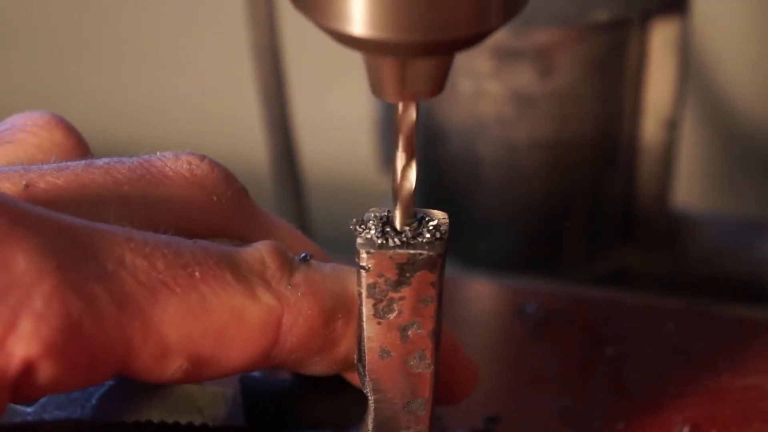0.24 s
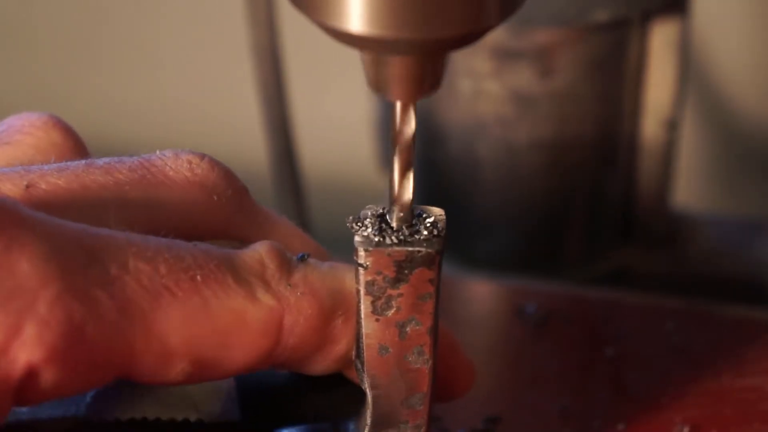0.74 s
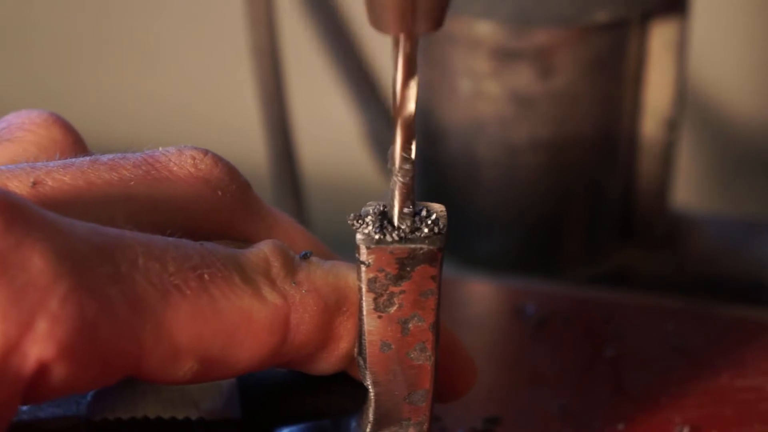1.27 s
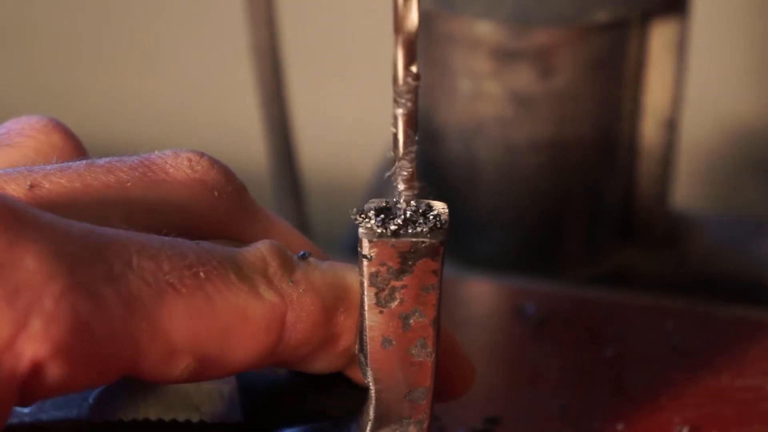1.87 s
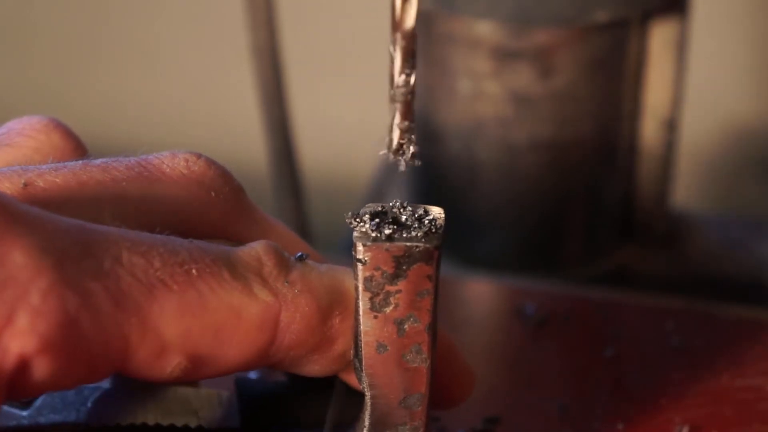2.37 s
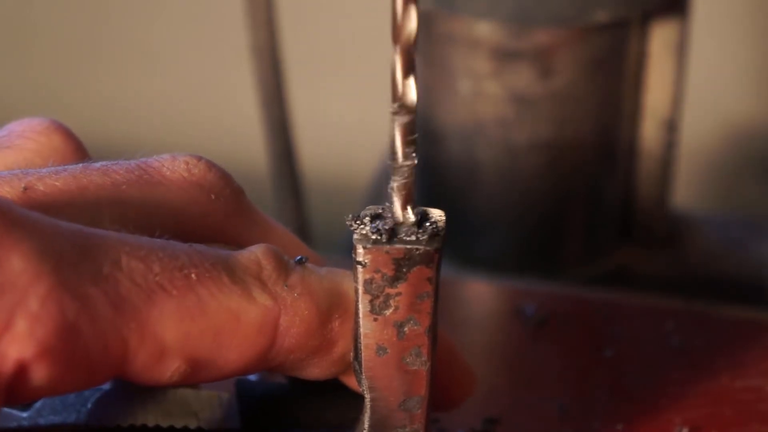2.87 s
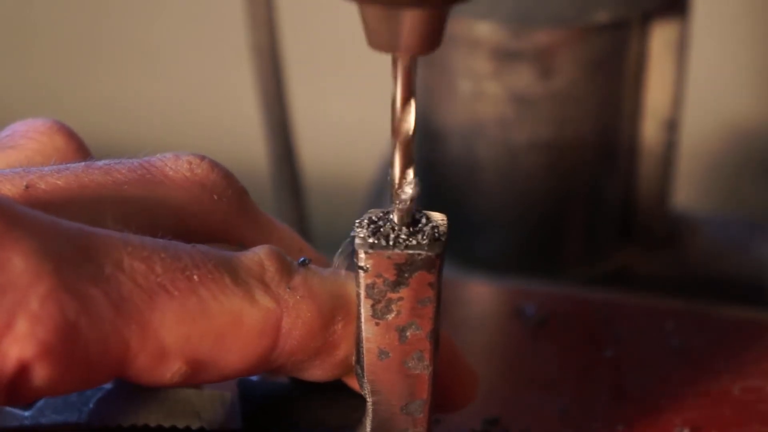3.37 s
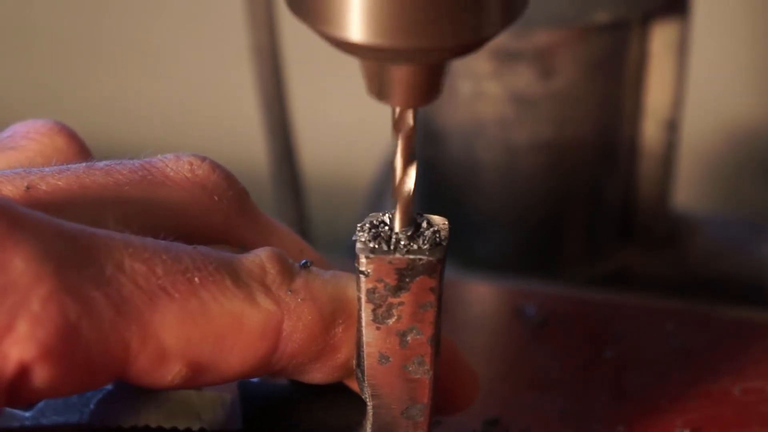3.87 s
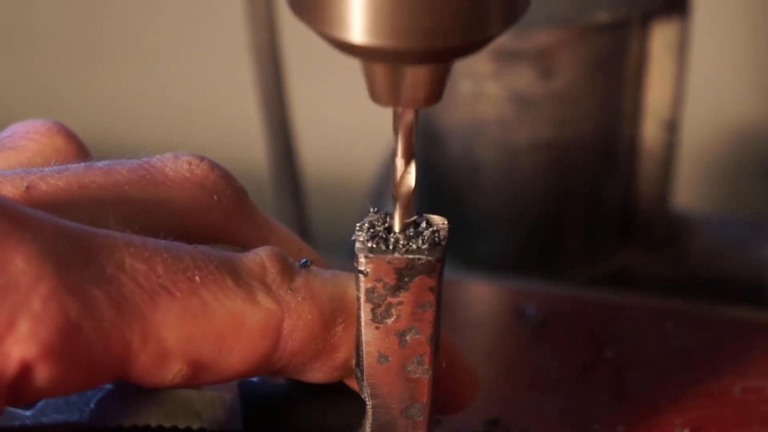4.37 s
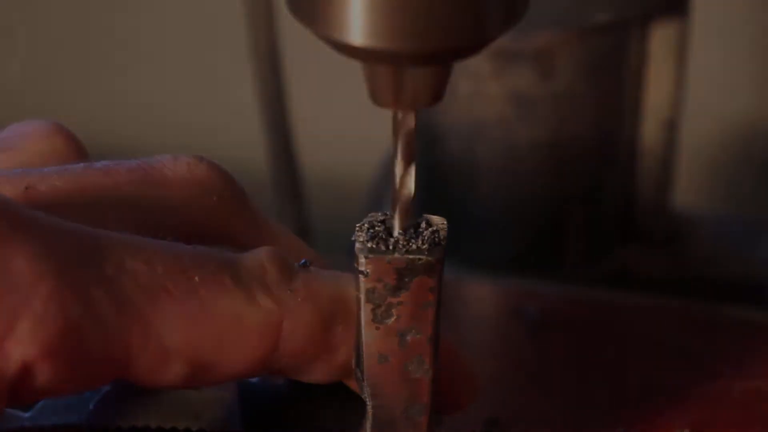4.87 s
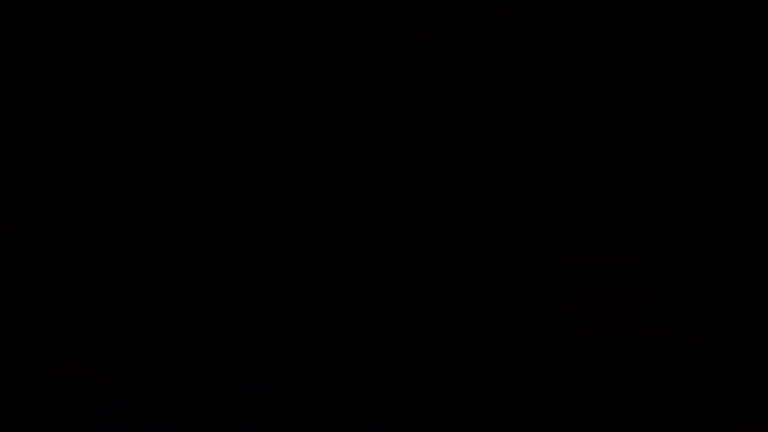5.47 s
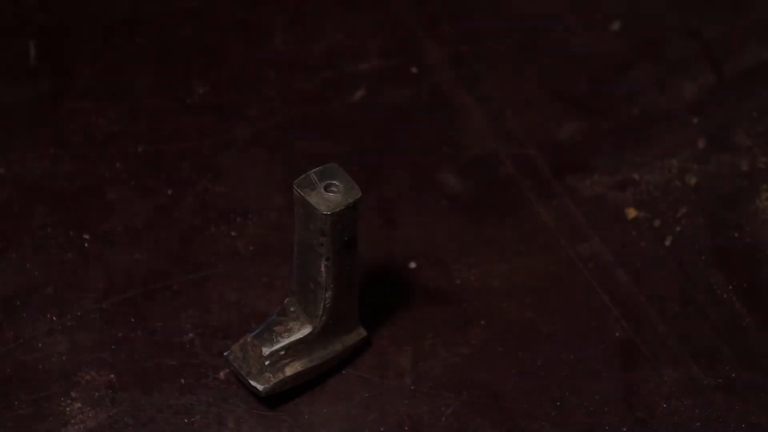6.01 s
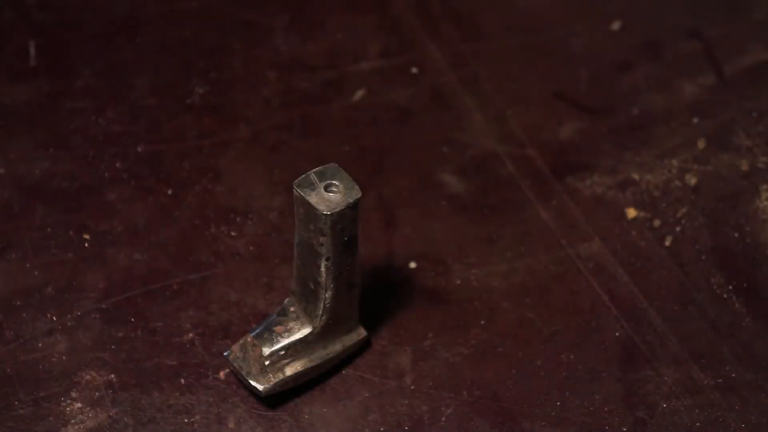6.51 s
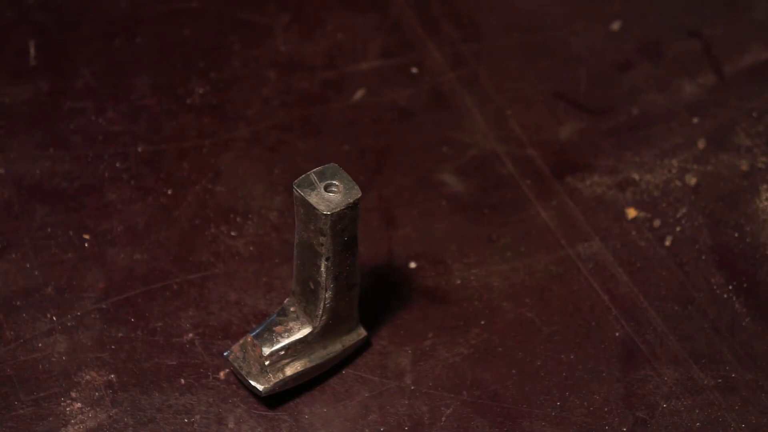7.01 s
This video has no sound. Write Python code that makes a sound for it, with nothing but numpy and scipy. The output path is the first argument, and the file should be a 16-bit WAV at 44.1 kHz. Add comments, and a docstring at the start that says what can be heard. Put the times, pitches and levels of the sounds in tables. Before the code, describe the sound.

A drill press runs close by with a steady motor whine, hum and rumble. Its bit bores into a steel spike with gritty hiss, thin high squeaks and irregular rattling clacks. The cutting eases off as the bit lifts while the motor keeps running, then it bites again. The sound cuts abruptly to a quiet workshop, with soft hand rustles, dull bench bumps and a few bright chinks of small steel parts.

```python
"""A drill press bores into a steel spike. From the start its induction motor whines over mains hum, belt
throb and a rumbling casting, while breaking chips ring the bit once a turn, its lip squeaks and the quill
clacks. The bit is lifted clear and the unloaded rotor speeds up; then the bit enters and cuts again.
At 5.5 s the sound cuts to the quiet workshop, where hands shuffle on a bench and small steel parts chink."""
import sys
import numpy as np
from scipy import signal
from scipy.io import wavfile
from scipy.ndimage import uniform_filter1d

SR = 44100
rng = np.random.default_rng(int(sys.argv[2]) if len(sys.argv) > 2 else 0)


def digitize_waveform(pressure):
    """Quantize a signal to 16-bit integers and store it at the path in sys.argv[1].

    Rows of a 2-D input are taken as channels; values are limited to [-1, 1].
    """
    field = np.atleast_2d(pressure).T
    bounded = np.clip(field, -1, 1)
    quanta = np.round(bounded * 32767).astype(np.int16)
    wavfile.write(sys.argv[1], SR, quanta)


N = 319720
TIME = np.arange(N) / SR

# Motor lines. Each row: rotor order added to the bar count, multiple of mains added, level in dB about
# WHINE_DB, left over right in dB, gain at full load in dB.
WHINE_LINES = [(0, 0, 1.5, 0, -0.5), (-1, 0, -16.5, 12.5, 4), (0, 2, -8, 2, -4.5), (0, 4, -18.5, 17.5, -2),
               (0, 6, -18.5, 4, -13), (0, 8, -12, 3.5, 2.5)]
ROTOR_BARS, WHINE_DB = 30, -18.5
SIDE = np.array([[.5], [-.5]])  # left and right shares of a stereo difference
def whine(rotor, mains, belt):
    """Modulation: rotor bars passing the slots make a tone that the mains field splits into sidebands."""
    out, effort = np.zeros((2, N)), load()
    joint = np.exp(12 * (np.cos(belt - 2.6) - 1))  # the belt's stiff spot meets the pulley once a lap
    tug = 0.35 * np.sin(2 * belt)
    for order, k, db, pan_db, load_db in WHINE_LINES:
        phase = (ROTOR_BARS + round(order)) * rotor + k * mains + tug + 0.12 * k * joint
        flutter_db = (1.57 + 0.13 * k) * wander(30) - (1 + 0.12 * k) * joint
        level_db = WHINE_DB + db + load_db * effort + flutter_db + pan_db * SIDE
        out += gain_of(level_db) * np.sin(phase - 0.34 * SIDE + rng.uniform(0, 2 * np.pi))
    return out


# Hum of the iron. Each row: multiple of mains, level in dB, left over right in dB.
HUM_LINES = [(2, -30, 0), (4, -25, -1.5)]
def hum(mains):
    """Magnetic force: the iron vibrates at even harmonics of the mains."""
    return sum(gain_of(db + 2.25 * wander(11) + pan_db * SIDE)
               * np.sin(k * mains + 0.18 * wander(23) - 0.029 * SIDE) for k, db, pan_db in HUM_LINES)


# Belt harmonics. Each row: cycles per lap, level in dB.
BELT_LINES = [(7, -36), (8, -39)]
def belt_throb(belt):
    """Beating: neighbouring harmonics of the belt swell together once a lap."""
    return sum(gain_of(db + wander(4)) * np.sin(order * belt + order) for order, db in BELT_LINES)


# Rumble spectrum. Each row: frequency in Hz, relative density in dB.
CASTING_SPECTRUM = [(20, 5), (40, -6), (75, 4), (150, -6.5), (300, 2.5), (600, -1), (1000, 2), (1350, -8.5),
                    (2000, -10), (4500, -30), (16000, -33)]
# Resonances of the casting. Each row: frequency in Hz, width in Hz, strength in dB.
CASTING_MODES = [(761, 35.5, 8), (1128, 17, 7), (451.8, 6, 1), (1281, 14, 14), (184.7, 12.3, 14.5)]
def casting_rumble(mains):
    """Forced vibration: noise shakes the casting's modes; loose panels rattle until load clamps them."""
    def response(hz):
        peaks = sum(gain_of(db) / (1 + ((hz - f) / (w / 2)) ** 2) for f, w, db in CASTING_MODES)
        return gain_of(read(CASTING_SPECTRUM, hz)) * (1 + peaks)
    pull = 1 + 0.24 * np.cos(2 * mains)  # magnetic pull pulses at twice mains
    casting = pull * noise(response, PRESS_COHERENCE, patchy_db=2)
    panels = resonate(casting, 406, 610) + 1.3 * resonate(casting, 1200, 440)
    rattle = np.maximum(gain_of(2 - 4.5 * load()), .6) - 1
    return gain_of(-23) * (casting + rattle * panels)


# Rotor speed, lower as the feed is pressed. Each row: time in seconds, bar-passing frequency in Hz.
BAR_PITCH = [(0, 738.6), (.65, 738), (.82, 741.6), (1.5, 742.4), (1.9, 743), (3.3, 742.7), (4.05, 740.2),
             (4.45, 738.9), (5.53, 739.3)]
MAINS_HZ, TURNS_PER_LAP = 50, 4.5
def motor():
    """Superposition: rotor, mains and belt each drive vibration at their own rate."""
    rotor = 2 * np.pi * np.cumsum(curves(BAR_PITCH)[0] / ROTOR_BARS) / SR
    mains, belt = 2 * np.pi * MAINS_HZ * TIME, rotor / TURNS_PER_LAP
    tones = whine(rotor, mains, belt) + hum(mains) + belt_throb(belt)
    return np.sqrt(2) * tones + casting_rumble(mains)


IDLE_HZ, FULL_LOAD_DROP_HZ = 743, 4
def load():
    """Induction slip: the share of full load is proportional to the drop in bar-passing frequency."""
    return np.clip((IDLE_HZ - curves(BAR_PITCH)[0]) / FULL_LOAD_DROP_HZ, 0, 1.5)


def fractures(clump_db, per_second=3000):
    """Poisson process: chips break as impulses of random sign and size, weighted by clump_db."""
    hits, draw = np.zeros(N), rng.uniform(-1, 1, N)
    at = abs(draw) < per_second / SR
    hits[at] = np.sign(draw[at]) * gain_of(clump_db[at] + 3 * np.minimum(rng.exponential(1, at.sum()), 5))
    return hits


# Modes of the bit, the upper one last. Each row: frequency in Hz, width in Hz, relative level in dB.
BIT_MODES = [(9880, 360, 8), (8780, 760, -0.5), (6900, 360, -9.5), (11500, 1100, 5)]
def bit_ring(spin, ring_db, upper_db):
    """Impulse excitation: fractures ring the bit in clumps once a turn; flexing bends its pitch."""
    out = np.zeros(N)
    for (hz, width, db), level_db in zip(BIT_MODES, [ring_db] * 3 + [upper_db]):
        hits = fractures(6.5 * np.cos(spin) + 3.5 * wander(50))
        flexed_hz = hz * (1 + 0.009 * wander(20))
        out += gain_of(db + level_db) * unit_rms(swept(hits, flexed_hz, width))
    return out


def sizzle(spin, upper_db):
    """Shot noise: fine swarf sizzles, following the bit's upper mode by half in dB."""
    hits = [fractures(2.6 * np.cos(spin) + 2.5 * wander(40)) for ear in range(2)]
    return gain_of(upper_db / 2 - 26) * unit_rms(resonate(hits, 15000, 2200))


# Grabs of the lip. Each row: time in seconds, level in dB, pitch in Hz.
SQUEAKS = [(0.7153, -23, 8340), (0.782, -16, 15000), (0.7956, -18, 10100), (0.841, -15, 9000),
           (0.9027, -22, 10180), (0.919, -27, 11200), (0.992, -23, 11300), (1.043, -16.5, 9970),
           (1.137, -15, 11000), (1.219, -20, 11600), (3.65, -14, 11540), (3.7239, -20, 11700),
           (3.899, -13.5, 9940), (4.056, -25, 11300), (4.1763, -14, 11640), (4.29, -10.5, 11100),
           (4.4021, -9, 11600), (4.8521, -14.5, 10050), (5.1168, -20, 9930)]
def squeaks():
    """Stick-slip friction: the cutting lip rubs, grabs and lets go."""
    out, t = np.zeros(N), np.arange(-1200, 1600) / SR
    for s, db, hz in SQUEAKS:
        rub = unit_rms(resonate(rng.standard_normal(len(t)) ** 3, hz, 450))
        grab = np.exp(-abs(t) / 0.0015) * np.sin(2 * np.pi * hz * t)
        add(out, s - 1150 / SR, gain_of(db) * (0.19 * rub * np.exp(-(t / 0.0073) ** 2) + grab))
    return out


# Single chips. Each row: start in seconds, level in dB, centre in Hz.
SNAPS = [(0.104, -21, 11000), (3.142, -28, 12000), (3.2754, -26, 6860), (3.329, -29, 10500),
         (3.354, -23, 12500), (3.421, -28, 8370)]
def snaps():
    """Brittle fracture: chips snap off in broadband bursts as the bit finds the hole."""
    out, t = np.zeros(N), np.arange(600) / SR
    for s, db, hz in SNAPS:
        burst = unit_rms(resonate(rng.standard_normal(len(t)), hz, 0.77 * hz))
        add(out, s, gain_of(db) * decay(t, 0.011) * burst)
    return out


# Modes of the held spike and its seat. Each entry: frequency in Hz.
SPIKE_HZ = [1540, 1840, 2280, 2630, 3440]
def crunch(spin):
    """Resonance: breaking chips ring the spike, hardest once a turn and under heavy feed."""
    breaking_db = 11 * np.exp(2 * (np.cos(spin + 0.9) - 1)) + 2 * wander(40)
    modes = sum(1500 / hz * unit_rms(resonate(fractures(breaking_db), hz, 0.15 * hz)) for hz in SPIKE_HZ)
    return gain_of(8 * load() - 50) * modes


# Long chips. Each row: start in seconds, level in dB.
RASPS = [(.18, -37), (.315, -34), (.433, -35)]
def rasps(start_hz=3730, fall_hz_per_s=74000, rise_s=0.017):
    """Swept resonance: a long chip tears off in a falling scrape."""
    out, t = np.zeros(N), np.arange(1500) / SR
    for s, db in RASPS:
        tear = unit_rms(swept(rng.standard_normal(len(t)), start_hz - fall_hz_per_s * t, 660))
        add(out, s, gain_of(db) * t / rise_s * np.exp(1 - (t / rise_s) ** 2) * tear)
    return out


def scrape(ring_db, swish):
    """Sliding friction: a gritty hiss grows with the bit's ring and with each swish of the flutes."""
    drag = gain_of(-49 + 0.22 * (ring_db + 33.5)) + swish
    grit = gain_of(2 * wander(180))
    hiss = noise(lambda hz: band(hz, 3000, 15000) / (1 + hz / 20000), PRESS_COHERENCE, patchy_db=1)
    return 1.92 * drag * grit * hiss


# The bit rubs, lifts clear and re-enters. Each row: time in seconds, lower modes in dB, upper mode in dB.
RUBBING = [(0, -46, -55), (.5, -50.5, -62), (.7, -41, -55), (.85, -44, -45), (1.2, -53, -44.5),
           (1.5, -67, -66), (3.1, -67, -81), (3.3, -50, -46), (3.52, -39.5, -42), (3.65, -41.5, -39),
           (3.87, -39.5, -39.5), (4.0, -48, -53), (4.4, -46, -45), (4.55, -47.5, -51), (5.53, -45, -57)]
# Flutes drag through swarf. Each row: centre in seconds, half width in seconds, level in dB.
SWISHES = [(.61, 0.046, -38), (3.4, 0.31, -59), (4.49, 0.033, -42.5)]
def cutting(spindle_hz=8.71, load_drop_hz=.225):
    """Chip formation: the turning bit excites itself and the spike; dragging swarf hisses and damps it."""
    ring_db, upper_db = curves(RUBBING)
    drags = [np.exp(-((TIME - s) / width) ** 2) for s, width, db in SWISHES]
    swish = sum(gain_of(db) * drag for (s, width, db), drag in zip(SWISHES, drags))
    damp_db = -9 * sum(drags)
    spin = 2 * np.pi * np.cumsum(spindle_hz - load_drop_hz * load()) / SR + 0.93
    bit = bit_ring(spin, ring_db + damp_db, upper_db + damp_db)
    swarf = sizzle(spin, upper_db)
    bit += squeaks() + snaps()
    spike = crunch(spin) + rasps()
    far_bit = 0.69 * np.roll(bit, 1) + 0.17 * np.roll(bit, 157)  # the right side also hears the column
    return np.array([bit + spike, far_bit + np.roll(spike, 3)]) + swarf + scrape(ring_db, swish)


# Knocks of the quill. Each row: start in seconds, then rattle, crack and thud levels in dB.
CLACKS = [(0.081, -39, -19, -50), (0.316, -20, -20, -17), (0.3492, -23, -20.5, -24.5),
          (0.4326, -33, -22, -12), (0.6662, -26, -23, -4.5), (1.033, -17.5, -24, -4),
          (1.3878, -20, -43, -24), (1.4432, -17, -44, -29), (1.535, -3, -13.5, -35),
          (2.124, -19.5, -47, -28), (2.5525, -17.5, -39, -7.5), (2.6677, -21, -26.5, -30),
          (2.9714, -10.5, -19.5, -5.5), (3.377, -15, -16.5, -7.5), (3.477, -12, -24, -11),
          (3.488, -10.5, -17.5, -28), (3.717, -40, -27, -13), (4.548, -18, -19, -36.5),
          (5.427, -21, -44, -23)]
# Three quill modes, then two table modes. Each row: frequency in Hz, width in Hz, level in dB.
KNOCK_MODES = [(1970, 510, -0.5), (3350, 420, -7.5), (4800, 1300, -15.5), (346, 240, 2), (205, 83, -2.5)]
# The table's pure ring. Each row: frequency in Hz, level in dB, 60 dB decay time in seconds.
TABLE_RING = [(452.3, -21, 0.89)]
def clacks(loss_db_per_cycle=.018):
    """Impact: slack in the quill closes with a crack, rattling steel and a thud through the table."""
    out, t = np.zeros((2, N)), np.arange(6000) / SR
    crack_hz = 6300 + 3300 * load()  # brighter when the bit is pressed into the steel
    crack_shape = np.minimum(t / 0.0023, 1) * (decay(t, 0.022) + 0.11 * decay(t, 0.34))
    blow_shape = np.minimum(t / 0.0015, 1) * (decay(t, 0.055) + 0.24 * decay(t, 1))
    for s, rattle_db, crack_db, thud_db in CLACKS:
        shake = rng.standard_normal((4, 6001))
        sides, force, looseness = shake[:2, 1:], shake[2, 1:], shake[3, 1:]
        crack = 1.67 * resonate(sides + 0.35 * force, crack_hz[round(s * SR)], 7000) * crack_shape
        chatter = gain_of(0.33 * unit_rms(uniform_filter1d(looseness, 100)))
        blow = force * blow_shape * chatter
        modes = []
        for (hz, width, db), louder, sharper in zip(KNOCK_MODES, shake[2], shake[3]):  # no two land alike
            mode = resonate(blow, hz * (1 + 0.045 * sharper), width) * np.sqrt(SR / width) / 4
            modes.append(gain_of(db + 0.73 * louder - loss_db_per_cycle * hz * t) * mode)
        rattle = gain_of(rattle_db) * sum(modes[:3])
        thud = gain_of(thud_db) * np.minimum(t / 0.0093, 1) ** 2 * sum(modes[3:])
        add(out, s, gain_of(crack_db) * crack + (rattle + thud) * gain_of(-1.1 * SIDE))
        add(out, s + 0.00996, gain_of(thud_db) * ring(TABLE_RING))
    return out


# Steel parts touch. Each row: start in seconds, level in dB, index of the part, damping factor.
CHINKS = [(6.595, -39.5, 0, 0.35), (6.717, -10.5, 1, 0.55), (6.776, -18, 1, 1.9), (6.806, -31, 2, 0.5),
          (7.071, -38, 2, 0.68), (7.098, -22, 2, 1.9), (7.139, -37, 2, 0.57)]
# One list of modes a part. Each row: frequency in Hz, level in dB, 60 dB decay in seconds at damping 1.
PART_MODES = [
    [(5300, -11, 0.62), (6300, 0, 0.23), (11100, -5, 0.21)],
    [(8140, -14.5, 0.28), (8330, -7.5, 0.19), (7800, -16, 0.16)],
    [(7860, 3, 0.062), (8800, -4, 0.027), (7200, 0, 0.017)],
]
def chinks():
    """Free vibration: small steel parts tick on contact and ring, held in an uneven grip."""
    out = np.zeros((2, N))
    for s, db, part, damping in CHINKS:
        sound = ring(PART_MODES[round(part)], damping)
        grip = gain_of(2.6 * wander(43)[:len(sound)])
        sound *= np.minimum(TIME[:len(sound)] / 0.00049, 1) * grip
        sound[:40] += 0.23 * np.diff(rng.standard_normal(41))  # the contact tick
        add(out, s, gain_of(db) * np.array([1.86 * sound, 0.5 * np.roll(sound, 3)]))
    return out


# Knocks on the bench. Each row: start in seconds, level in dB.
BUMPS = [(6.13, -32), (6.249, -32), (6.318, -36.5), (6.375, -30.5), (6.911, -35), (6.985, -34.5)]
def bumps():
    """Damped resonance: the bench top answers a scuffed knock with two broad, dull modes."""
    out, t = np.zeros(N), TIME[:6000]
    for s, db in BUMPS:
        knock = rng.standard_normal(len(t))
        wood = unit_rms(resonate(knock, 370, 520) + 0.46 * resonate(knock, 225, 150))
        add(out, s, gain_of(db - 9.5) * (decay(t, 0.53) + 0.77 * decay(t, 0.12)) * wood)
    return out


# Finger slides. Each row: start in seconds, length in seconds, level in dB.
SLIDES = [(6.271, 0.01, -33.5), (6.43, 0.083, -49), (6.58, 0.114, -45)]
def hands():
    """Friction noise: hands rustle and fingers slide over the bench in two wide bands."""
    handling = gate(start=6.2, length=1, edge=0.12)
    slides = sum(gain_of(db) * gate(s, length, edge=0.0089) for s, length, db in SLIDES)
    rustle = gain_of(0.94 * wander(42.5)) * rng.standard_normal((2, N))
    high = (gain_of(-43.5) * handling + slides) * unit_rms(resonate(rustle, 11200, 11400))
    mid = (gain_of(-42.5) * handling + gain_of(-13) * slides) * unit_rms(resonate(rustle, 4620, 9100))
    return high + mid


# Still air. Each row: frequency in Hz, relative density in dB.
ROOM_SPECTRUM = [(20, -11), (74, -2.5), (101, -13.5), (422, -28), (1660, -26.5), (5000, -35.5),
                 (10200, -34.5), (16000, -36.5)]
# Likeness of the two sides. Each row: frequency in Hz, coherence from 0 to 1.
ROOM_COHERENCE = [(60, 1), (240, 0.57), (900, 0)]
def room_tone(thin_hz=12950, pulse_hz=28):
    """Diffuse field: room noise is alike on both sides only in the bass; a faint thin tone pulses in it."""
    air = noise(lambda hz: gain_of(read(ROOM_SPECTRUM, hz)), ROOM_COHERENCE, patchy_db=-1.5, skewed=False)
    pulse_db = 5 * np.sin(2 * np.pi * pulse_hz * TIME)
    return gain_of(-42.5) * air + gain_of(pulse_db - 63) * np.sin(2 * np.pi * thin_hz * TIME)


# The press at two microphones. Each row: frequency in Hz, coherence from 0 to 1.
PRESS_COHERENCE = [(60, 1.0), (240, 0.95), (950, 0.82), (3770, 0.45), (15000, 0.85)]
# Level difference. Each row: frequency in Hz, left over right in dB.
LEFT_TILT = [(60, -0.7), (950, 0.21), (3770, 1.3), (15000, 1.5)]
# Phase difference. Each row: frequency in Hz, lead of the left side in radians.
LEFT_LEAD = [(40, 0.072), (900, -0.2), (10000, -1.3)]
def noise(shape, coherence, patchy_db, skewed=True):
    """Partial coherence: two sides share part of a noise of rms 1, with gain shape(Hz) and drifting patches."""
    hz = np.fft.rfftfreq(2048, 1 / SR)
    a, b, c, d, patches = np.ascontiguousarray(rng.standard_normal((N // 512 + 6, 1025, 5)).T)
    patches = unit_rms(uniform_filter1d(uniform_filter1d(patches, 16, 0), 5, 1))
    shared, left = np.clip(read(coherence, hz), 0, 1)[:, None], a + 1j * b
    right = shared * left + np.sqrt(1 - shared ** 2) * (c + 1j * d)
    if skewed:
        right *= (np.exp(-1j * read(LEFT_LEAD, hz)) / gain_of(read(LEFT_TILT, hz)))[:, None]
    spectra = np.array([left, right]) * shape(hz)[:, None] * gain_of(patchy_db * patches)
    return unit_rms(signal.istft(spectra, nperseg=2048, noverlap=1536)[1][:, :N])


def ring(modes, damping=1, seconds=0.19):
    """Modal decay: a struck body sounds as a sum of dying sines."""
    t = np.arange(round(seconds * SR)) / SR
    return sum(gain_of(db) * decay(t, t60 / damping) * np.sin(2 * np.pi * hz * t) for hz, db, t60 in modes)


def resonate(x, hz, width):
    """Band-pass resonance of gain 1."""
    edges = np.clip([hz - width / 2, hz + width / 2], 20, .45 * SR)
    return signal.sosfilt(signal.butter(2, edges, "band", fs=SR, output="sos"), x)


def swept(x, hz, width):
    """Heterodyning: a resonance of gain 1 follows a pitch curve."""
    carrier, r = np.exp(2j * np.pi * np.cumsum(hz) / SR), np.exp(-np.pi * width / SR)
    return 2 * (carrier * signal.lfilter([(1 - r) ** 2], [1, -2 * r, r * r], x / carrier)).real


def band(hz, lo_hz, hi_hz):
    """Gain of a soft-edged pass band."""
    return 1 / np.sqrt((1 + (lo_hz / (hz + 1)) ** 6) * (1 + (hz / hi_hz) ** 6))


def wander(top_hz):
    """Low-passed random drift of rms 1."""
    lowpass = signal.butter(2, top_hz, fs=SR / 64, output="sos")
    coarse = signal.sosfilt(lowpass, rng.standard_normal(N // 64 + 2))
    return np.interp(np.arange(N) / 64, np.arange(len(coarse)), unit_rms(coarse))


def gate(start, length, edge):
    """Trapezoidal envelope, with times in seconds."""
    t = TIME - start
    return np.clip(np.minimum(t, length - t) / edge + .5, 0, 1)


def decay(t, t60):
    """Exponential decay by 60 dB in t60 seconds."""
    return gain_of(-60 * t / t60)


def gain_of(db):
    """Decibels to amplitude."""
    return 10 ** (np.asarray(db) / 20)


def unit_rms(x):
    """Normalisation to rms 1."""
    return x / np.sqrt(np.mean(x ** 2) + 1e-20)


def read(points, hz):
    """Interpolation of a spectrum over log frequency."""
    f, value = np.transpose(points)
    return np.interp(np.log(hz + 1), np.log(f + 1), value)


def curves(rows):
    """Interpolation of each column over time."""
    s, *columns = np.transpose(rows)
    return [np.interp(TIME, s, c) for c in columns]


def add(mix, s, sound):
    """Superposition of a sound at s seconds."""
    part = mix[..., round(s * SR):][..., :sound.shape[-1]]
    part += sound[..., :part.shape[-1]]


def scene(cut_s=5.538, fade_s=0.015):
    """Crossfade: the running press gives way to the quiet workshop."""
    press = motor() + cutting() + clacks()
    workshop = room_tone() + hands() + bumps() + chinks()
    share = np.clip((cut_s - TIME) / fade_s, 0, 1)
    return share * press + (1 - share) * workshop


def record(dry, threshold_db=-21.5, release_db_per_s=13.9, edge_hz=15900):
    """Compression: gain control, most sensitive to treble, ducks all after a peak; a low-pass follows."""
    bright = signal.sosfilt(signal.butter(1, 1500, "high", fs=SR, output="sos"), dry)
    power_db = 10 * np.log10(abs(uniform_filter1d((bright ** 2).mean(0), 300)) + 1e-12)
    fall_db = release_db_per_s * TIME
    held_db = np.maximum.accumulate(power_db + fall_db) - fall_db  # peak detector with a steady release
    over_db = np.maximum(held_db - threshold_db, 0)
    ducked = dry / gain_of(0.54 * uniform_filter1d(over_db, 200))
    lowpass = signal.firwin(511, edge_hz, window=("kaiser", 9), fs=SR)
    return signal.oaconvolve(ducked, lowpass[None], "same")


dry = scene()
out = record(dry)
digitize_waveform(out)
```